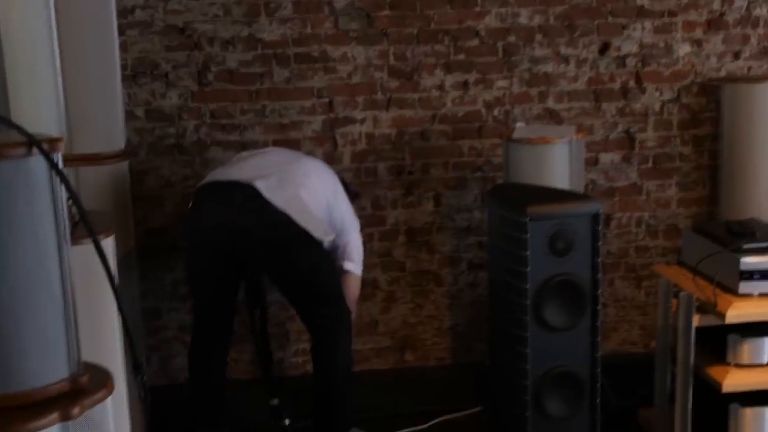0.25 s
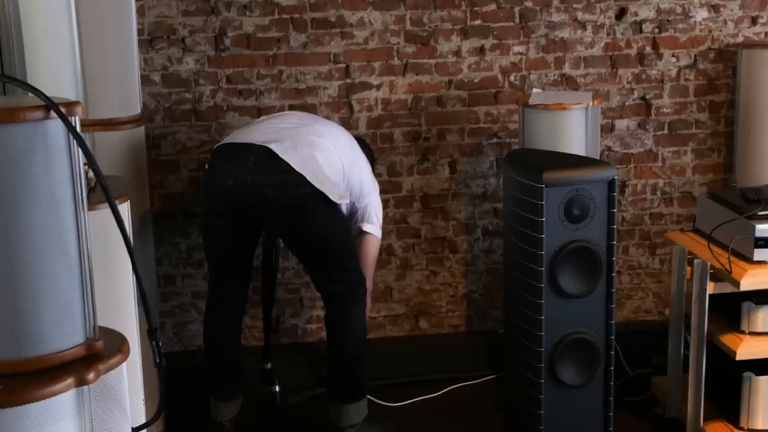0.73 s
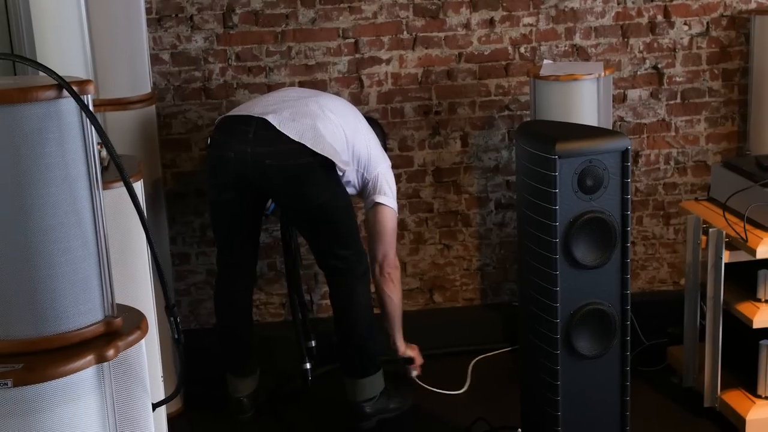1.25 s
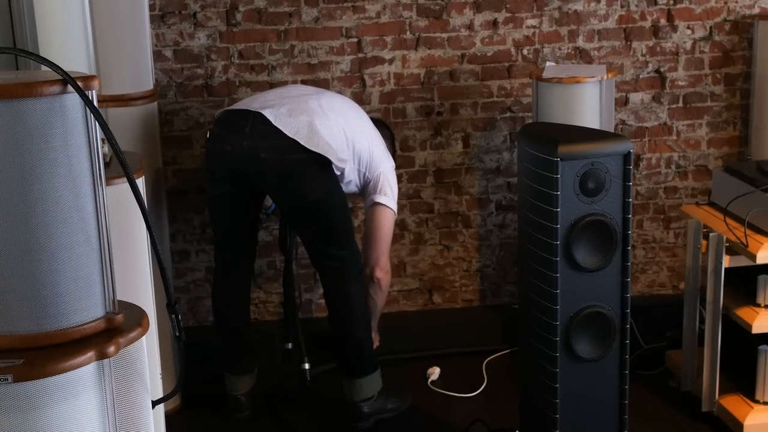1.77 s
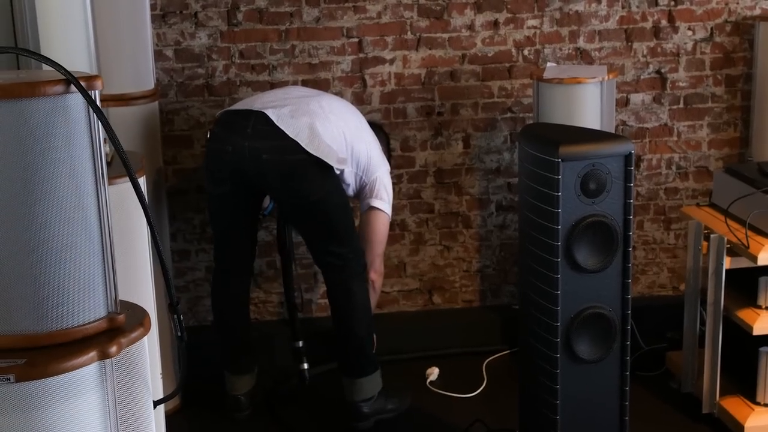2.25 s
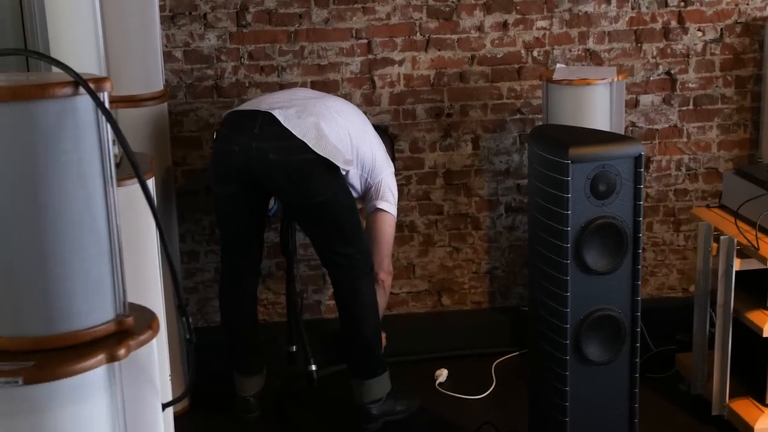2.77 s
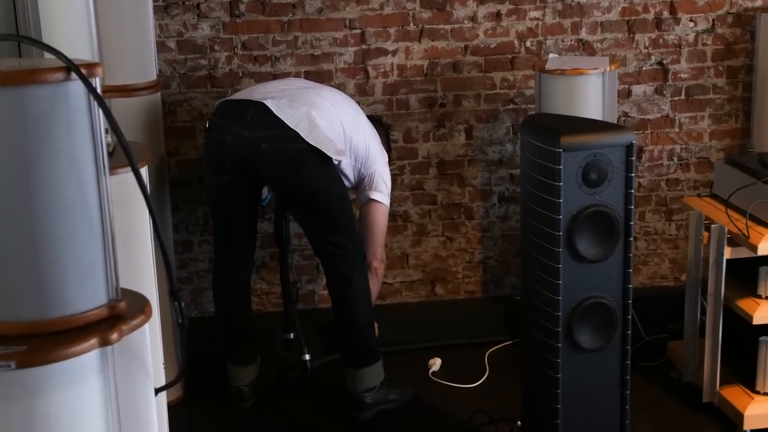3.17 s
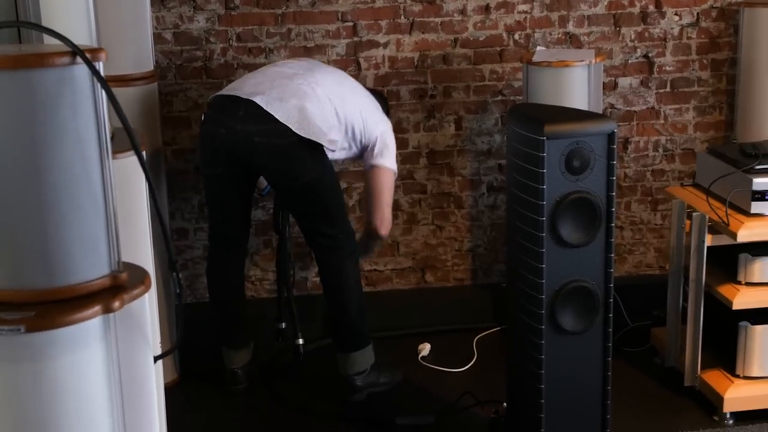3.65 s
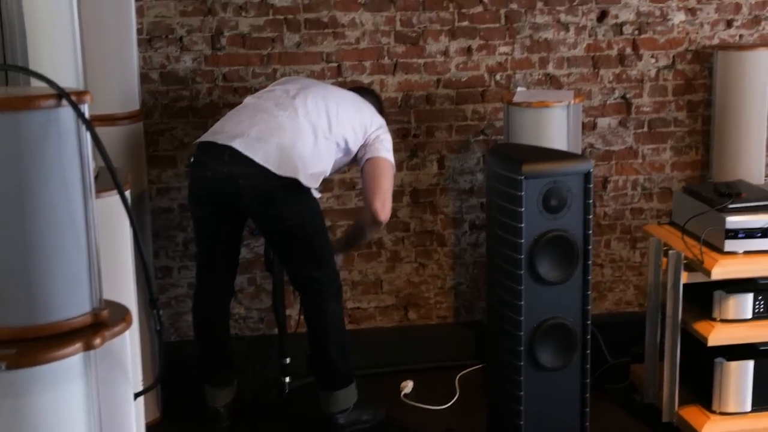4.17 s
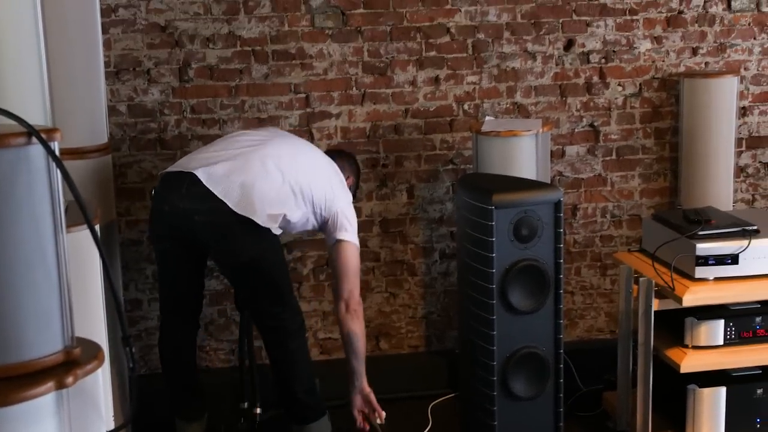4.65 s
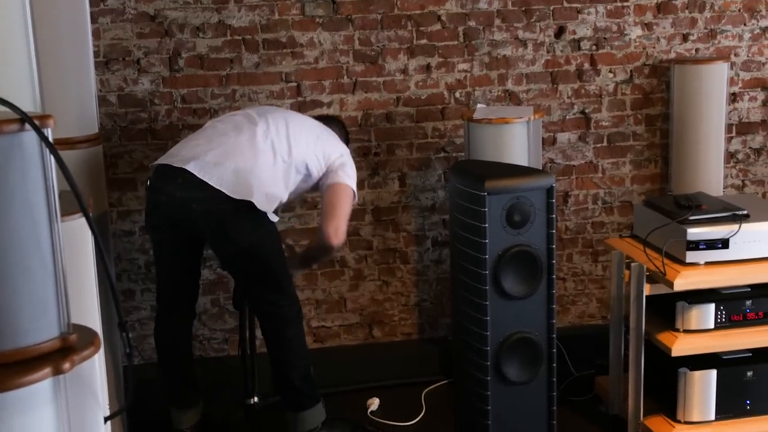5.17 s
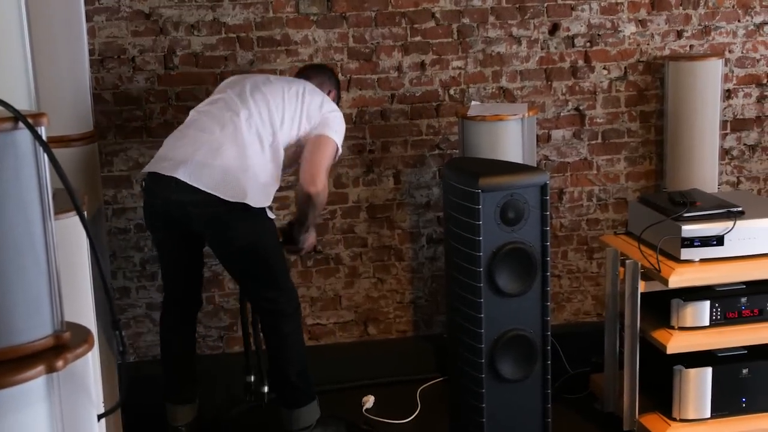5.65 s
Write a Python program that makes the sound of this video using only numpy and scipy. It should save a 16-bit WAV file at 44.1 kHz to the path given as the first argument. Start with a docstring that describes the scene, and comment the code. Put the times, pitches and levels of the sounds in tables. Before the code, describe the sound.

A mains plug is pulled, clatters onto a floor, and another taps and thumps into a wall socket amid close cloth rustle.

```python
"""Shirt cloth rustles and crackles close by over a faint rumble of room air, with soft scuffs on the floor.
Then someone works at a wall outlet: one mains plug is pulled and clatters onto the floor, another taps
around the socket and is pushed home; later a plug is picked up from the floor.
Blows are short mixes of fading tones and noise, sliding parts are bursts of rough noise, and cloth and air
are noise with shaped colour and level. Echoes and a fading tail put the sounds in a room."""
import sys
import numpy as np
from scipy import signal
from scipy.io import wavfile
from scipy.ndimage import uniform_filter1d

SR = 44100
rng = np.random.default_rng(int(sys.argv[2]) if len(sys.argv) > 2 else 0)


def store_pcm(level_fs):
    """Save levels as 16-bit WAV."""
    pcm = np.round(np.clip(level_fs, -1, 1) * 32767).astype(np.int16)
    wavfile.write(sys.argv[1], SR, np.atleast_2d(pcm).T)


N = 261072   # length of the scene, samples
RING_TIME = np.arange(SR // 8) / SR   # time within one contact, s
LEAD_S = 0.02   # room for the sliding before each contact, s

# floor boards under the plug, one ringing tone a row: pitch_hz, level_db, time to fade by 60 dB fade_s
FLOOR_TONES = [(187, -1.5, 0.064), (210, 2.5, 0.042), (260, 0, 0.039), (312, 3, 0.15), (458.5, 3.5, 0.11),
               (627, -4, 0.03), (700, -15, 0.055), (799, -8.5, 0.06), (968, 6.5, 0.012), (1240, -11, 0.02)]
# broad resonances of the plastic plug on the floor: pitch_hz, width_hz, level_db
FLOOR_PLASTIC = [(1540, 880, 6.4), (1890, 1200, 3.9), (3820, 1000, 0.88), (5000, 1070, 17.7),
                 (8150, 1700, 0.68), (13100, 4700, 3.6)]
# the body bends, leans and pushes: start_s, length_s, rumble_db, rub_db
BODY_MOVES = [(0, .3, -48.5, -53.5), (0.47, 0.68, -54.5, -62), (1.024, 0.16, -44, -45.5),
              (1.402, 0.23, -51.5, -47.5), (2.465, 0.46, -63, -48.5), (3.053, 0.17, -51, -50),
              (3.282, 0.21, -56, -48.5), (3.543, 0.24, -51, -55.5), (4.642, 0.068, -47.5, -55),
              (5.55, 0.068, -56, -53)]
# the shirt slides over the microphone: start_s, length_s, swish_db
SHIRT_STROKES = [(0, 0.16, -68.5), (0.196, 0.066, -64.5), (0.419, 0.031, -63), (0.499, 0.013, -70.5),
                 (2.97, 0.024, -66), (3.608, 0.056, -62.5), (4.156, .06, -74), (4.23, 0.03, -64),
                 (4.348, 0.051, -61.5), (5.053, 0.14, -70.5), (5.236, 0.021, -67), (5.543, 0.074, -52.5),
                 (5.762, 0.12, -63.5)]


def from_db(db):
    """Turn decibels into a gain."""
    return 10 ** (np.asarray(db) / 20)


def rms_one(x):
    """Scale a sound to an average (rms) strength of 1."""
    return x / np.sqrt(np.mean(x ** 2) + 1e-20)


def burst(x, db):
    """Give a short sound the energy of 10 ms at this level."""
    energy = np.sum(x ** 2) + 1e-20
    return from_db(db) * x * np.sqrt(SR / 100 / energy)


def band(x, low_hz, high_hz, order=2):
    """Keep mainly the pitches between two limits, with a Butterworth filter."""
    limits = [low_hz, min(high_hz, 0.45 * SR)]
    sos = signal.butter(order, limits, "band", fs=SR, output="sos")
    return signal.sosfilt(sos, x + 1e-18)


def at_hz(points, hz, axis=1):
    """Read a table column at any pitch, along a logarithmic pitch scale."""
    points = np.array(points)
    return np.interp(np.log(hz), np.log(points[:, 0]), points[:, axis])


def add(track, sound, s):
    """Mix a sound into a track from time s."""
    start = max(round(s * SR), 0)
    track[start:start + len(sound)] += sound[:N - start]


def panned(x, left_db):
    """Make the left side louder than the right by this many decibels."""
    return x * from_db([[left_db / 2], [-left_db / 2]])


def drift(rate):
    """Wander at random, through this many chance values a second joined by straight lines."""
    position = np.arange(N) / SR * min(rate, 300)
    return np.interp(position, np.arange(2000), rng.standard_normal(2000))


def noise_bands(size):
    """Yield half-octave bands of stereo noise, partly alike in both ears: (centre Hz, noise)."""
    # how alike left and right are: pitch_hz, likeness (0 to 1)
    likeness = [(25, .3), (60, 0.58), (250, 0.54), (700, 0.33), (2000, 0.31), (6000, 0.7), (14000, 0.83)]
    edges_hz = 18 * 2 ** (np.arange(21) / 2)
    white = rng.standard_normal((2, 2, size))
    for k, (low, high) in enumerate(zip(edges_hz, edges_hz[1:])):
        mid, side = band(white[k % 2], low, high)
        hz = np.sqrt(low * high)
        alike = np.clip(at_hz(likeness, hz), 0, 1)
        yield hz, np.sqrt(1 + alike) * mid + np.sqrt(1 - alike) * side * [[1], [-1]]


def coloured(spectrum):
    """Build stereo noise with this balance of pitches, at rms 1."""
    return rms_one(sum(from_db(at_hz(spectrum, hz)) * noise for hz, noise in noise_bands(N)))


def gestures(rows, still_db, rise_db_per_s, fall_db_per_s):
    """Level in dB of movements (start_s, length_s, level_db) that swell, hold and fade to stillness."""
    t = np.arange(N) / SR
    power = from_db(still_db) ** 2
    for start, length, db in rows:
        early = np.maximum(start - t, 0)
        late = np.maximum(t - start - length, 0)
        power = power + from_db(db - rise_db_per_s * early - fall_db_per_s * late) ** 2
    return 10 * np.log10(power)


def room(x, wet_db, echo_db, scatter_db):
    """Add scatter from things nearby, a few reflections, and a diffuse tail whose treble dies first."""
    # lingering tail of the room: pitch_hz, time to fade by 60 dB fade_s, level_db
    tail = [(77.6, 0.98, 1.5), (248, 0.65, -12.5), (756, 0.4, -5), (1720, 0.34, -6.5), (5000, 0.32, -13),
            (9000, 0.23, -17.5), (15000, 0.077, -14)]
    # reflections from nearby floor, wall and body: delay_s, left_db, right_db
    echoes = [(.0052, -15.5, -12), (.0093, -8.5, -26.5), (0.0179, -34, -29), (.021, -35, -26)]
    t = np.arange(SR) / SR
    response = 0
    for hz, noise in noise_bands(SR):
        fade_s, db = at_hz(tail, hz), at_hz(tail, hz, axis=2)
        decay = from_db(-60 * t / fade_s) * (1 - np.exp(-t / 0.00076))
        response = response + from_db(db + wet_db) * noise * decay / np.sqrt(2 * np.sum(decay ** 2))
    for delay_s, *sides_db in echoes:
        click = np.arange(SR) == round(delay_s * SR)
        dulled = signal.lfilter([0.4], [1, -0.6], click)
        response = response + from_db(np.array(sides_db) + echo_db)[:, None] * dulled
    # sideways scatter arrives a moment later and reaches the two ears with opposite signs
    scatter = rng.standard_normal(SR) * np.exp(-t / 0.005) * (t > 0.002)
    scatter = rms_one(band(scatter, 200, 14000, order=1)) / np.sqrt(SR)
    response = response + from_db(scatter_db) * scatter * [[1], [-1]]
    return x + signal.fftconvolve(x[None], response, axes=1)[:, :N]


def friction(slide_s, settle_s, grain_db):
    """Tiny slips swell while two parts slide, and die away once they seat."""
    t = RING_TIME - LEAD_S
    swell = np.exp(np.where(t < 0, t / max(slide_s, 1e-4), -t / settle_s))
    # each slip holds one chance level for 16 samples
    slips = np.repeat(rng.standard_normal(len(t)), 16)[:len(t)]
    return swell * rng.standard_normal(len(t)) * from_db(grain_db * np.clip(slips, -2, 2))


def ringing(modes, low_hz, high_hz, scatter_db, detune):
    """Ring the tones within a range, each with a chance strength and detuned by the grip."""
    hz, db, fade_s = np.array(modes).T[:, :, None]
    strength, grip = rng.standard_normal((2, len(hz), 1))
    in_range = (hz >= low_hz) * (hz < high_hz)
    gain = from_db(db + scatter_db * strength - 60 * RING_TIME / fade_s) * in_range
    sign = (-1) ** np.arange(len(hz))[:, None]
    tones = np.sin(2 * np.pi * hz * (1 + detune * grip) * RING_TIME)
    return np.sum(sign * gain * tones, axis=0)


def thump(modes, low_hz, high_hz, crowd_top_hz, dense_db, dense_fade_s):
    """Clear tones plus the crowd of weaker ones between them, heard as a short noise."""
    crowd = rng.standard_normal(len(RING_TIME)) * from_db(-60 * RING_TIME / dense_fade_s)
    clear = ringing(modes, low_hz, high_hz, scatter_db=2.5, detune=0.03)
    return burst(clear, 0) + burst(band(crowd, low_hz, crowd_top_hz), dense_db)


def shell(force, resonances):
    """The plastic colours the slips with broad resonances; the rest of the grit radiates directly."""
    out = signal.lfilter([0.6], [1, -0.4], force)
    for hz, width_hz, db in resonances:
        r = np.exp(-np.pi * width_hz / SR)   # a wider resonance dies sooner
        feedback = [1, -2 * r * np.cos(2 * np.pi * hz / SR), r * r]
        resonance = signal.lfilter([1, 0, -1], feedback, force + 1e-18)
        out = out + from_db(db) * (1 - r * r) / 2 * resonance
    return out


def contacts(rows, modes, resonances, settle_s, body_lag_s, dense_db, scrape_db):
    """Each blow rocks the low tones of the body; the friction around it excites the hard plastic shell."""
    out = np.zeros(N)
    bottom_hz, thud_top_hz, knock_top_hz = 110, 520, 1400
    press = 1 - np.exp(-RING_TIME / 0.0017)   # the force takes a moment to build
    for s, thud_db, knock_db, clack_db, snap_db, slide_s in rows:
        # a soft blow has little knock and a deeper thud; a blunt one has little snap and loses its top
        soft_hz = np.clip(580 * from_db(0.29 * (knock_db - thud_db)), 220, 800)
        sharp_hz = np.clip(17000 * from_db(0.5 * (snap_db - clack_db)), 10000, 17500)
        low = thump(modes, bottom_hz, thud_top_hz, crowd_top_hz=513, dense_db=dense_db, dense_fade_s=0.09)
        middle = thump(modes, thud_top_hz, knock_top_hz, crowd_top_hz=997,
                       dense_db=dense_db, dense_fade_s=0.035)
        add(out, burst(band(low * press, 100, soft_hz), thud_db), s + body_lag_s - 0.003)
        add(out, burst(band(middle * press, 400, 1500), knock_db), s - 0.002)
        rub = friction(slide_s, settle_s, grain_db=3.5)
        plastic = shell(rub, resonances)
        add(out, burst(band(rub, 340, 640), knock_db + scrape_db), s - LEAD_S)
        add(out, burst(band(plastic, 1540, 3700), clack_db), s - LEAD_S)
        add(out, burst(band(plastic, 4350, sharp_hz), snap_db), s - LEAD_S)
    return out


def room_air():
    """The air is steady, mostly low noise; a deeper rumble swells as the body moves."""
    # steady air noise: pitch_hz, relative level_db per Hz
    air_colour = [(15, -26), (25, -21), (49, 10), (76, 1), (236, 4), (301, -15), (545, -8), (775, -11.5),
                  (840, -18), (2220, -24.5), (12200, -34), (14800, -38), (16000, -32)]
    # rumble of the moving body: pitch_hz, relative level_db per Hz
    rumble_colour = [(20, -40), (35, -41), (57, 14), (75, 1), (110, 14.5), (170, -36.5)]
    moves = [(s, length, db) for s, length, db, _ in BODY_MOVES]
    rumble_db = gestures(moves, still_db=-57, rise_db_per_s=250, fall_db_per_s=97)
    return from_db(-58) * coloured(air_colour) + from_db(rumble_db) * coloured(rumble_colour)


def clothing():
    """Cloth rubs dully and hisses as the body moves; single fibres catch in clumps."""
    # dull rubbing: pitch_hz, relative level_db per Hz
    rub_colour = [(90, 0.5), (180, -7.5), (320, 0.5), (500, -5), (750, -3.5), (1300, -12.5), (3000, -27),
                  (6000, -36)]
    # bright hiss: pitch_hz, relative level_db per Hz
    swish_colour = [(1200, -29), (2500, -4.5), (4500, -1.5), (8000, -1.5), (13000, -9.5), (16000, -1.5)]
    moves = [(s, length, db) for s, length, _, db in BODY_MOVES]
    rub_db = gestures(moves, still_db=-57.5, rise_db_per_s=232, fall_db_per_s=105)
    swish_db = gestures(SHIRT_STROKES, still_db=-75.5, rise_db_per_s=417, fall_db_per_s=170)
    rub = from_db(rub_db - 1.5 + 2.5 * drift(34)) * coloured(rub_colour)
    swish = from_db(swish_db + 1.0 + 3.7 * drift(70)) * coloured(swish_colour)
    # chance catches, whose rate per second wanders around 420
    caught = rng.random(N) < 420 * from_db(4 * drift(25)) / SR
    fibres = uniform_filter1d(caught * rng.exponential(1, N), size=50) * rng.standard_normal(N)
    crackle = from_db(swish_db - 1.5) * rms_one(band(fibres, 1300, 12400, order=1))
    return rub + panned(swish + crackle, left_db=-1.5)


def stroke_creases(count):
    """Every stroke of the shirt sheds a few ticks at random moments and levels."""
    return [(start + length * rng.random(), db + 9 - 11 * rng.random())
            for start, length, db in SHIRT_STROKES for _ in range(count)]


def creases():
    """Folds of cloth snap free in bright ticks, each a very short burst of friction."""
    # single folds, loud and faint, catching at the microphone: start_s, level_db
    single_folds = [(.438, -46), (0.585, -42.5), (.698, -42), (3.191, -53.5), (3.286, -55.5), (3.402, -47),
                    (3.417, -48), (3.965, -58), (4.261, -50.5), (4.368, -47.5), (4.387, -56), (4.444, -60),
                    (5.055, -56), (5.121, -53.5), (5.197, -37.5), (5.208, -45), (5.541, -43),
                    (5.616, -32.5), (5.634, -41), (5.752, -45.5), (5.762, -45.5), (5.77, -36.5), (5.8, -46),
                    (5.816, -46.5)]
    # a fold below this level loses this much more crackle per dB, and so sounds thinner
    big_fold_db, thinning = -32, 0.067
    out = np.zeros(N)
    for s, db in single_folds + stroke_creases(count=5):
        slip = friction(slide_s=0.0006, settle_s=0.0018, grain_db=4)
        crackle_db = db - thinning * max(big_fold_db - db, 0)
        crackle = band(slip, 2580, 11500) + 0.36 * band(slip, 560, 2950)
        add(out, burst(crackle, crackle_db), s - LEAD_S)
        add(out, burst(band(slip, 8500, 17000), db + 0.5), s - LEAD_S)   # fizz on top
    return out


def scuffs():
    """Shoes and cable scuff the floor in soft, dull blows that share one balance of levels."""
    # scuffs: start_s, knock_db
    scuff_list = [(0.102, -58.5), (0.179, -51.5), (0.283, -52), (.348, -56), (0.437, -53), (.584, -47.5),
                  (0.691, -51), (.744, -56), (.774, -56.5), (3.54, -55), (3.866, -59.5), (5.014, -60)]
    # thud, clack and snap levels all follow the knock; the sliding swells over 7.2 ms
    rows = [(s, db + 3, db, db, db - 4.5, 0.0072) for s, db in scuff_list]
    return contacts(rows, FLOOR_TONES, FLOOR_PLASTIC, settle_s=0.0069, body_lag_s=0.0025,
                    dense_db=0, scrape_db=6)


def bounces(touches, count):
    """A plug that lands hard rocks from edge to edge; every other bounce is on its softer side."""
    hard_knock_db, gap_s = -33, 0.0293
    body_loss_db, click_loss_db, soft_side_db = 2.8, 3.0, -9   # losses are per bounce
    rows = []
    for s, thud_db, knock_db, clack_db, snap_db, slide_s in touches:
        if knock_db > hard_knock_db:
            for k in range(1, count + 1):
                side_db = soft_side_db * (k % 2)
                body_db = side_db / 2 - body_loss_db * k
                click_db = side_db - click_loss_db * k
                rows.append((s + gap_s * k, thud_db + body_db, knock_db + body_db,
                             clack_db + click_db, snap_db + click_db, slide_s / 2))
    return rows


def plug_on_floor():
    """Boards thud and knock and plastic clacks at each floor contact; a hard landing rattles on."""
    # plug and cable land, and later the plug knocks as it is picked up:
    # start_s, thud_db, knock_db, clack_db, snap_db, sliding time slide_s
    touches = [(1.378, -24.5, -46, -57, -56.5, 0.0015), (1.4307, -21, -25, -29.5, -30, 0.0011),
               (1.654, -34, -43.5, -55, -56, .003), (4.652, -45, -48.5, -40, -41.5, 0.0015),
               (4.683, -44.5, -42, -36, -39.5, 0.001), (4.699, -49, -50, -59, -40.5, 0.004)]
    return contacts(touches + bounces(touches, count=3), FLOOR_TONES, FLOOR_PLASTIC, settle_s=0.0037,
                    body_lag_s=0.0016, dense_db=-4.5, scrape_db=-7)


def plug_in_socket():
    """Plug and hand knock on the socket: its box rings in low tones while the plastic scrapes and snaps."""
    # contacts: start_s, thud_db, knock_db, clack_db, snap_db, sliding time slide_s
    touches = [(1.012, -39.5, -42.5, -55, -66, 0.0012), (1.034, -27, -29.5, -30, -37, 0.0066),
               (1.048, -37, -58, -26, -22, 0.011), (2.158, -31, -31, -35, -42.5, 0.0033),
               (2.382, -54, -42.5, -51, -59.5, 0.0049), (2.429, -28.5, -27, -39.5, -42, 0.0012),
               (2.515, -22, -22.5, -35.5, -33.5, 0.0022), (2.584, -35.5, -48, -46.5, -50.5, 0.0024),
               (2.650, -27.5, -29.5, -41.5, -44, 0.003), (2.692, -30, -36, -41.5, -41.5, .0043),
               (2.813, -34.5, -27.5, -36.5, -38, 0.0022), (2.851, -37, -35.5, -47.5, -49.5, 0.0041),
               (3.024, -12, -21.5, -28, -26.5, 0.003), (3.049, -42, -28.5, -38.5, -34, 0.0023),
               (3.078, -34, -40, -55, -52, .0022), (3.319, -24.5, -36, -45.5, -46.5, 0.0048),
               (3.345, -35, -34, -29, -31, 0.0021)]
    # socket box with the plug against it: pitch_hz, level_db, time to fade by 60 dB fade_s
    box_tones = [(128, -26, 0.21), (203, -54, 0.01), (249.3, 0, 0.14), (297.7, 5, 0.085), (364, 0, 0.062),
                 (458.6, 0, 0.07), (510, -25, 0.062), (647, 3, 0.054), (745, -0.5, 0.046), (785, 0, 0.021),
                 (1003, -18, 0.027), (1250, -9.5, 0.046)]
    # broad resonances of the plastic plug: pitch_hz, width_hz, level_db
    plug_plastic = [(1920, 560, 15), (3000, 4000, 36.5), (4460, 400, 33), (5680, 190, 21)]
    return contacts(touches, box_tones, plug_plastic, settle_s=0.0023, body_lag_s=0.00301,
                    dense_db=-10, scrape_db=-7)


def scene():
    """Mix the air, the close and drier cloth, and the floor and socket sounding through the room."""
    air = room_air()
    ticks = panned(room(creases(), wet_db=-2, echo_db=0.5, scatter_db=-21), left_db=0.5)
    cloth = ticks + clothing()
    floor = room(plug_on_floor() + scuffs(), wet_db=4.5, echo_db=-4.5, scatter_db=-12)
    socket = room(plug_in_socket(), wet_db=2.5, echo_db=2.0, scatter_db=-12.5)
    return air + cloth + panned(floor, left_db=-1.0) + panned(socket, left_db=-1.1)


def record(dry):
    """Make the left side a little brighter than the right, and cut steeply above 16200 Hz."""
    treble = signal.sosfilt(signal.butter(1, 5000, "high", fs=SR, output="sos"), dry)
    heard = dry - treble + panned(treble, left_db=1.5)
    return signal.sosfilt(signal.ellip(10, 0.2, 80, 16200, fs=SR, output="sos"), heard)


dry = scene()
out = record(dry)
store_pcm(out)
```